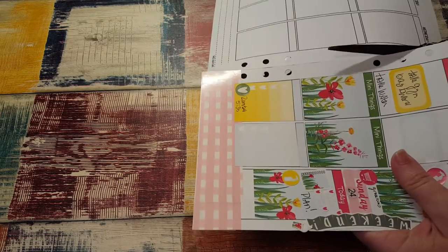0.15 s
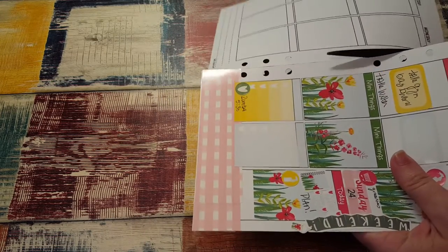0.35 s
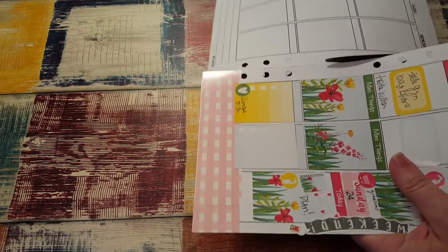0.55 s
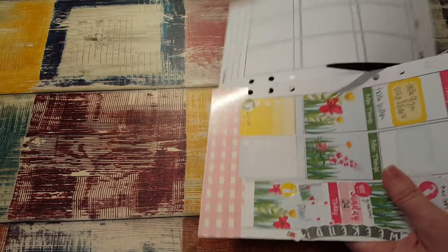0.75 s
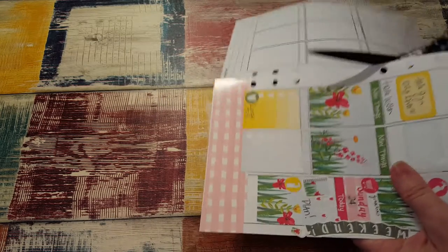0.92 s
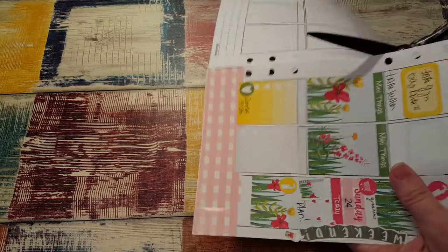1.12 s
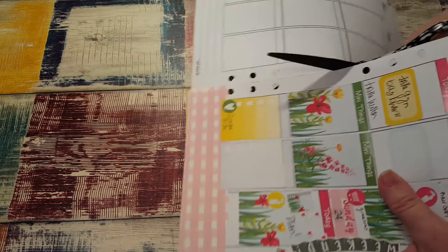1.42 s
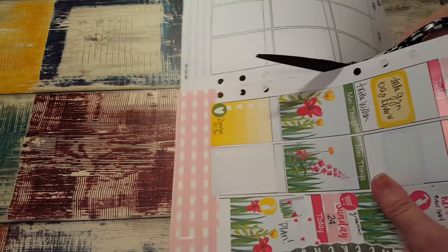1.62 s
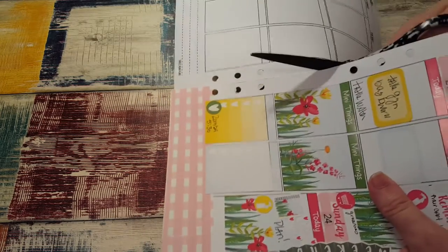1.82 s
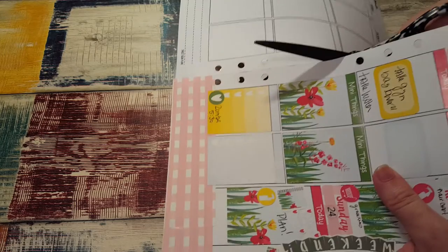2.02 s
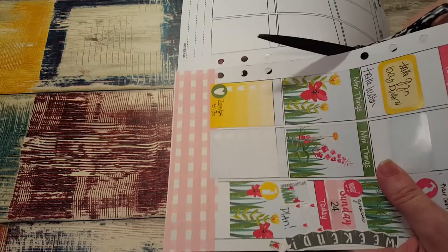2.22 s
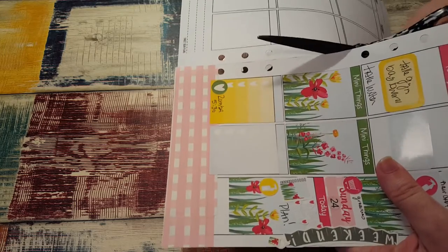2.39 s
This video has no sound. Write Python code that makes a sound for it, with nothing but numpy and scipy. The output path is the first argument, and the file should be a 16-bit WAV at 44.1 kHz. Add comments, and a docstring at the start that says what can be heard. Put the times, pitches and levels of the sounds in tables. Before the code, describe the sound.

Close scissor cuts through a crackling paper sheet, with a brief pause near the end.

```python
"""Jerky short scissor cuts through stickered paper pages, close to a phone, with a pause before the last.
Tearing fibres click densely into the resonances of the sheet, the blades hiss on the paper edge,
and the sheet buckles with single pops. Behind them lies a quiet room with a faint hum."""
import sys
import numpy as np
from scipy import signal
from scipy.fft import rfft, irfft
from scipy.io import wavfile
from scipy.ndimage import uniform_filter1d, map_coordinates

SR = 44100
rng = np.random.default_rng(int(sys.argv[2]) if len(sys.argv) > 2 else 0)


def wav_out(sig):
    """Save sig, one row per channel (or a flat mono array), as 16-bit PCM at SR to the path in sys.argv[1]."""
    wavfile.write(sys.argv[1], SR, np.round(np.clip(np.atleast_2d(sig).T, -1, 1) * 32767).astype(np.int16))


N = 112454
TIME, BIN_HZ = np.arange(N) / SR, np.arange(N // 2 + 1) * SR / N


def undb(db):
    return 10 ** (np.asarray(db) / 20)


def unit(x):
    return x / np.sqrt(np.mean(x ** 2))


def colour(x, points, scale=1):
    """Filter by (Hz, dB) points joined on a log axis."""
    hz, db = np.array(points, float).T
    curve_db = np.interp(np.log(np.maximum(BIN_HZ, 1)), np.log(hz), db)
    return irfft(rfft(x) * undb(scale * curve_db), N)


def ring(x, peaks, passes=2):
    """Sum of resonances; more passes give steeper flanks."""
    out = 0
    for hz, width, db in peaks:
        b, a = signal.iirpeak(hz, hz / width, fs=SR)
        out = out + undb(db) * signal.sosfilt(np.tile(np.r_[b, a], (passes, 1)), x)
    return out


def wander(per_s=25):
    """A smooth random curve around zero."""
    step = int(SR / per_s)
    return uniform_filter1d(np.repeat(rng.standard_normal(N // step + 1), step), step)[:N]


def swell(share=1, depth_db=3.5):
    return undb(share * depth_db * wander())


def clicks(per_s, scatter_db, cap_db=9):
    """Random clicks, many small and a few large. Rows: common to both sides, spread between them."""
    chance, sign, size = rng.random((3, 2, N))
    size_db = np.minimum(-scatter_db * np.log(size + 1e-9), cap_db)
    return (chance < per_s / SR) * np.sign(sign - .5) * undb(size_db)


# The quiet room around the phone. Each row: frequency in Hz, relative noise density in dB.
ROOM_NOISE = [(24, -3.5), (40, -1), (123, -6), (162, -9), (248, -13), (344, -19.5), (431, -9.5), (582, -21),
              (912, -20), (1540, -28), (2140, -27.5), (2480, -29.5), (10100, -42.5), (14700, -37),
              (15800, -43)]
# A faint hum in the background. Each row: frequency in Hz, level in dB.
HUM_TONES = [(59.3, -67.5), (119, -69.5)]
def room_tone(noise_db=-62.5, wide_above_hz=700, waver_rad=0.47):
    """Room noise, alike on both sides in the bass, and a wavering hum."""
    mid, side = colour(rng.standard_normal((2, N)), ROOM_NOISE)
    side = signal.lfilter(*signal.butter(1, wide_above_hz, "high", fs=SR), side)
    hum = sum(undb(db) * swell(.5) * np.sin(2 * np.pi * hz * TIME + waver_rad * swell())
              for hz, db in HUM_TONES)
    return undb(noise_db) * unit(np.array([mid + side, mid - side])) + np.sqrt(2) * hum


def room_reverb(x, t60_s=0.14, level_db=-21, dull_hz=4170):
    """The room answers with a short, dull tail."""
    t = np.arange(SR // 2) / SR
    tail = signal.lfilter(*signal.butter(1, dull_hz, fs=SR), rng.standard_normal((2, len(t))))
    tail *= undb(-60 * t / t60_s)
    tail /= np.sqrt(np.sum(tail ** 2) / 2)
    return undb(level_db) * signal.fftconvolve(x[None], tail, axes=1)[:, :N]


# Stereo width at the phone. Each row: frequency in Hz, gain of the spread signal in dB.
STEREO_WIDTH = [(300, -60), (1000, -20.5), (2500, 0), (8000, -1)]
# Balance at the phone. Each row: frequency in Hz, left minus right in dB.
STEREO_TILT = [(100, 1), (250, 0.5), (600, -3), (1290, 4.5), (2400, -1.5), (4400, -2), (8100, -3.5),
               (14000, 4)]
def direct_sound(common, spread, left_lag_s=0.00013):
    """The paper is heard from close by, wide in the treble and slightly later on the left."""
    spread = colour(spread, STEREO_WIDTH)
    left = irfft(rfft(common + spread) * np.exp(-2j * np.pi * BIN_HZ * left_lag_s), N)
    return np.array([colour(left, STEREO_TILT, .5), colour(common - spread, STEREO_TILT, -.5)])


def bending_ring(x, peaks, share, pitch_drift=0.04):
    """As the sheet bends, each resonance swells and fades, and all slide in pitch together."""
    ringing = sum(swell(share) * ring(x, [peak]) for peak in peaks)
    read_at = np.cumsum(1 + pitch_drift * wander())
    return np.array([map_coordinates(row, [read_at], mode="mirror") for row in ringing])


# The ring of the sheet close up, then a low rumble. Each row: frequency in Hz, width in Hz, gain in dB.
SHEET_MODES = [(437, 50, -5), (550, 163, 4.5), (650, 173, 6), (804, 470, 8), (1026, 470, -11.5),
               (1116, 440, -1), (1535, 310, -6)]
RUMBLE_MODES = [(122, 92, 0), (201, 214, 1.5)]
def tearing_paper(fibres):
    """Fibre clicks ring the sheet; the rumble is its flexing in a stroke, background in the pause."""
    return bending_ring(fibres, SHEET_MODES, share=0.91), ring(fibres, RUMBLE_MODES)


# Blades on the paper edge, close up. Each row: frequency in Hz, width in Hz, gain in dB.
EDGE_MODES = [(2053, 740, 2.5), (2480, 970, 7.5), (4270, 1430, 4), (5130, 990, -3), (6430, 990, 0.5),
              (7950, 860, 3)]
# Colour of the finest grit, then of a cut against a slide. Each row: frequency in Hz, gain in dB.
FIZZ_COLOUR = [(7000, -12), (9000, -2.5), (12000, -4.5), (15500, -11)]
CUT_EMPHASIS = [(2600, 3), (4500, 1), (8200, -3), (11500, -2), (14000, 1.5)]
def blade_hiss(grit, slide_from_s=0.687, slide_to_s=2.3, swell_share=0.62):
    """Fine grit rings the edge and fizzes; the blades cut before and after the pages slide."""
    sliding = (TIME > slide_from_s) & (TIME < slide_to_s)
    grit = np.where(sliding, grit, colour(grit, CUT_EMPHASIS))
    return bending_ring(grit, EDGE_MODES, swell_share), swell(swell_share) * colour(grit, FIZZ_COLOUR)


# The sheet buckling near the microphone. Each row: time in seconds, swing level in dB, pitch in Hz,
# direction as 1 or -1, crack level in dB, thump level in dB.
BUCKLES = [(.219, -27.5, 700, 1, -45, -81), (0.2339, -21.5, 615, -1, -67, -41),
           (.385, -28.5, 700, -1, -46.5, -64), (0.4536, -12.5, 806, 1, -30, -23.5),
           (0.4573, -14.5, 810, 1, -32.5, -57), (.478, -15, 725, 1, -40, -74),
           (.668, -18, 1150, 1, -38, -60), (0.6704, -23.5, 1250, 1, -41.5, -60),
           (.709, -29, 915, 1, -34, -74), (.758, -39, 650, -1, -57, -47), (.946, -31, 650, 1, -44, -62),
           (.971, -33, 700, 1, -37.5, -43.5), (1.022, -33, 700, 1, -43.5, -49),
           (1.2, -36, 810, 1, -48, -74), (1.2745, -35.5, 750, -1, -57, -59),
           (1.3424, -38, 866, -1, -44.5, -46), (2.358, -35.5, 620, 1, -65, -72),
           (2.405, -37.5, 804, -1, -57, -64), (2.428, -25.5, 2130, 1, -36, -70),
           (2.478, -36, 780, 1, -54, -60), (.3545, -34, 805, 1, -46, -60), (.426, -29.5, 930, 1, -47, -50),
           (.704, -34, 990, -1, -40, -64), (0.819, -44, 700, 1, -61, -62), (.08, -37, 820, 1, -50, -62),
           (.118, -32, 775, 1, -46.5, -50.5), (.149, -34.5, 780, 1, -52, -60)]
def buckling_pops(sharpness=3.4, ring_db=-5, thump_hz=200, crack_dull_hz=4460):
    """Each buckle is a short pitched swing, the ring of the sheet, a treble crack and a low thump."""
    t = np.arange(SR // 5) / SR
    out = np.zeros((2, N + len(t)))
    fade = lambda t60_s: undb(-60 * t / t60_s)
    narrow_modes = [(hz, width / sharpness, db) for hz, width, db in SHEET_MODES]
    crack_modes = [*EDGE_MODES, (11000, 6800, -2.4)]  # a broad top is added
    sheet = ring(1. * (t == 0), narrow_modes, passes=1)
    dull = signal.butter(1, crack_dull_hz, fs=SR)
    for time_s, swing_db, hz, direction, crack_db, thump_db in BUCKLES:
        noise = signal.lfilter(*dull, rng.standard_normal((2, len(t))))
        crack = unit(ring(noise, crack_modes, passes=1)) * fade(t60_s=0.013)
        swing = np.sin(2 * np.pi * hz * t) * fade(t60_s=0.0073) + undb(ring_db) * sheet / sheet.max()
        thump = np.sin(2 * np.pi * thump_hz * t) * fade(t60_s=0.038)
        at = int((time_s - 1 / (4 * hz)) * SR)  # the first crest lands on time_s
        out[:, at:at + len(t)] += undb(crack_db) * crack
        out[0, at:at + len(t)] += np.sign(direction) * (undb(swing_db) * swing + undb(thump_db) * thump)
    return out[:, :N]


# Six scissor strokes close to the phone and a pause, one list each; in the pause (1.42 to 2.3 s),
# faint paper rustles over low background rumble. Each row: time in seconds, then levels in dB of
# sheet ring, edge grit, fizz and rumble.
SPAN_LEVELS = [
    [(0.0, -60, -74, -79, -75), (0.02, -50, -57.5, -65, -69), (0.036, -93, -85, -91, -78),
     (0.048, -48, -61, -66, -83), (0.062, -72, -75, -71, -54), (0.082, -39.5, -54, -65, -68),
     (0.09, -61, -70, -81, -68), (0.122, -43.5, -55, -63, -68), (0.132, -66, -73, -77, -78),
     (0.158, -42.5, -52, -65, -70), (0.182, -55.5, -66, -70, -59), (0.198, -43, -49.5, -60, -66),
     (0.206, -62, -65.5, -71, -79), (0.232, -30, -42, -54, -33), (0.248, -56, -69.5, -72, -61),
     (0.296, -54.5, -66, -73, -74), (0.33, -95, -105, -96, -73)],
    [(0.33, -98, -101, -90, -71), (0.34, -78, -101, -96, -75), (0.352, -40, -49, -56, -67),
     (0.36, -36, -64, -60, -70), (0.374, -62.5, -73, -84, -60), (0.384, -34, -65, -56, -73),
     (0.4, -53, -68.5, -73, -66), (0.43, -39.5, -56, -56, -56), (0.44, -57.5, -60.5, -72, -53),
     (0.452, -23.5, -42, -38, -36), (0.458, -26.5, -40, -48, -37), (0.468, -37, -62, -59, -33),
     (0.478, -29.5, -45, -56, -69), (0.494, -50, -61.5, -65, -62), (0.534, -66, -78, -84, -65),
     (0.58, -74, -90, -94, -54)],
    [(0.58, -78, -94, -91, -73), (0.6, -96, -101, -94, -56.5), (0.608, -72, -100, -87, -55),
     (0.628, -48.5, -80, -77, -51), (0.642, -38, -42, -54, -61), (0.66, -39, -52, -59, -49),
     (0.67, -35, -33, -55, -48), (0.682, -44.5, -57.5, -69, -55), (0.698, -49.5, -56.5, -58, -77),
     (0.708, -37, -44.5, -59, -60), (0.73, -56, -65, -70.5, -65), (0.762, -55, -68, -75, -55),
     (0.776, -74, -74, -86, -72), (0.8, -65, -86, -87, -63)],
    [(0.8, -67, -81, -86, -68), (0.81, -67, -80, -99, -73), (0.818, -52.5, -63, -79, -58),
     (0.846, -58.5, -55.5, -69, -81), (0.86, -51.5, -54, -67, -60), (0.874, -41, -49, -63, -66),
     (0.89, -44.5, -52.5, -73, -57), (0.91, -54.5, -63, -72, -61), (0.928, -51, -57, -74, -70),
     (0.942, -54, -52, -59, -79), (0.972, -40, -46, -73, -47), (0.984, -51.5, -62, -73, -56.5),
     (1.006, -55.5, -62, -75, -61), (1.012, -85, -58, -71, -79), (1.022, -41.5, -59, -57, -66),
     (1.04, -70, -69, -79, -61), (1.08, -70, -78, -92, -73)],
    [(1.08, -74, -78, -90, -63.5), (1.088, -74, -77, -97, -66), (1.13, -58, -70.5, -82, -67),
     (1.14, -70, -83, -92, -61.5), (1.16, -68, -70, -85, -82), (1.168, -53, -58.5, -71, -78),
     (1.188, -65.5, -60, -76, -67), (1.202, -42, -49.5, -60, -71), (1.22, -64.5, -73, -86, -61.5),
     (1.264, -51, -66.5, -82, -63), (1.276, -42.5, -54.5, -65, -54), (1.306, -40.5, -48, -61, -55),
     (1.336, -52, -53, -70, -75), (1.352, -46.5, -58.5, -64, -53), (1.37, -66, -69, -85, -74),
     (1.42, -60, -76, -95, -59)],
    [(1.42, -72, -71.5, -98, -72), (1.508, -88, -89, -103, -76), (1.644, -71, -89, -91, -65.5),
     (1.656, -63, -71.5, -87, -72), (1.754, -85, -90, -94, -64.5), (1.776, -63, -76, -98, -65),
     (1.824, -70.5, -80, -93, -74), (1.86, -63, -74, -100, -66), (1.89, -79, -92, -95, -74),
     (2.004, -71, -79, -100, -67), (2.144, -80, -86, -103, -67.5), (2.176, -55.5, -66.5, -78, -75),
     (2.192, -77, -84, -86, -68), (2.228, -66.5, -73, -94, -62), (2.3, -67, -86, -91, -66)],
    [(2.3, -75, -94, -90, -78), (2.336, -64, -71.5, -74, -74), (2.346, -75, -92, -97, -59),
     (2.358, -49, -51.5, -57, -73), (2.372, -60.5, -70.5, -72, -73), (2.388, -52, -56.5, -66, -55),
     (2.396, -71, -70, -78, -68), (2.408, -42, -55, -61, -76), (2.418, -54, -80, -67, -54.5),
     (2.428, -57, -46, -68, -65), (2.436, -45, -59, -67, -63), (2.468, -66, -67, -79, -60.5),
     (2.478, -46, -58, -67, -68), (2.492, -45, -55.5, -65, -52), (2.506, -60, -65, -74, -67),
     (2.528, -52, -57.5, -65, -61), (2.536, -58, -64, -74, -67), (2.55, -55, -55, -66, -70)],
]
def scissors_and_paper(dip_share=0.56, dip_s=0.0039):
    """Tearing and hiss surge with each stroke, sink in the pause and dip whenever the sheet pops."""
    rows = [span[:-1] for span in SPAN_LEVELS]  # each span ends where the next begins
    times, *levels_db = np.vstack(rows + [SPAN_LEVELS[-1][-1:]]).T
    fibres, grit = clicks(per_s=1500, scatter_db=1), clicks(per_s=6000, scatter_db=2.5)
    sheet, rumble = tearing_paper(fibres)
    edge, fizz = blade_hiss(grit)
    layers = zip((sheet, edge, fizz, rumble), levels_db)
    mix = sum(unit(x) * undb(np.interp(TIME, times, db)) for x, db in layers)
    dips = [1 - dip_share * np.exp(-((TIME - pop_s) / dip_s) ** 2) for pop_s, *_ in BUCKLES]
    return mix * np.prod(dips, axis=0)


def scene():
    """Scissors and paper up close, the room behind them."""
    common, spread = scissors_and_paper() + buckling_pops()
    return direct_sound(common, spread) + room_reverb(common) + room_tone()


def record(dry, bass_cut_hz=51.3, top_hz=15760):
    """The phone cuts the deep bass and the top."""
    thin = signal.sosfilt(signal.butter(6, bass_cut_hz, "high", fs=SR, output="sos"), dry)
    return signal.sosfilt(signal.ellip(12, .2, 80, top_hz, fs=SR, output="sos"), thin)


dry = scene()
out = record(dry)
wav_out(out)
```